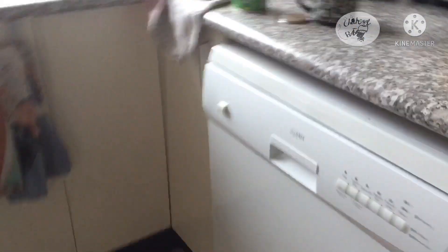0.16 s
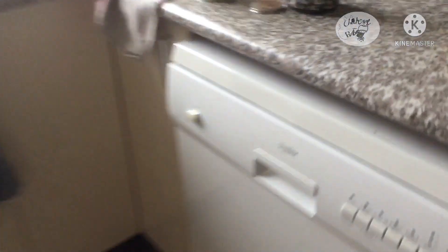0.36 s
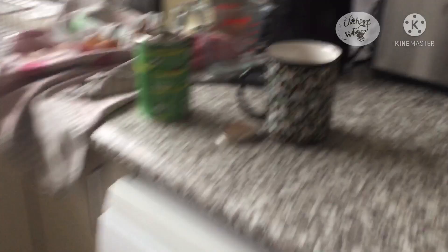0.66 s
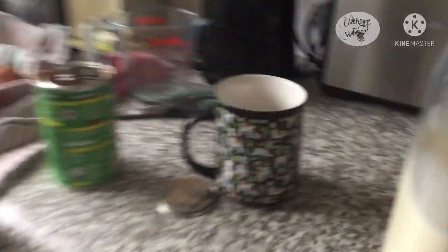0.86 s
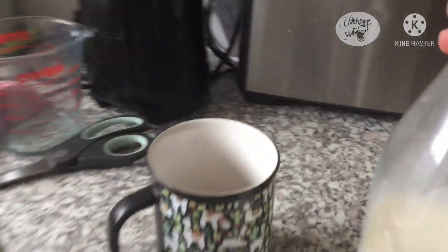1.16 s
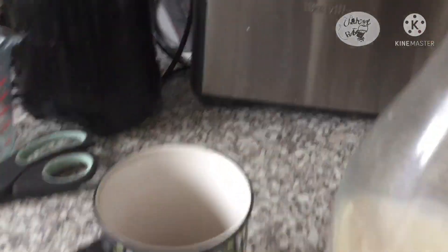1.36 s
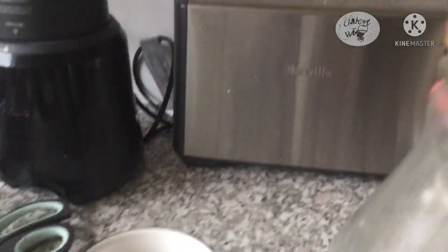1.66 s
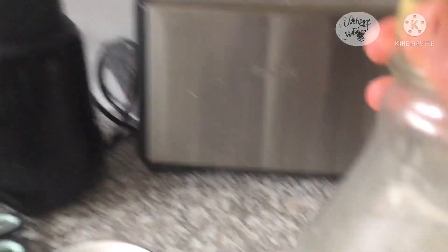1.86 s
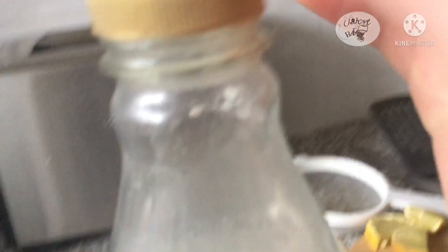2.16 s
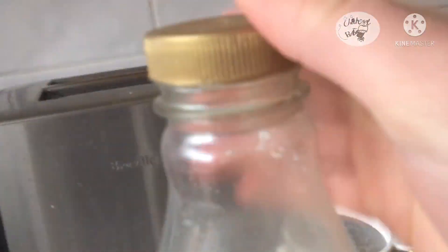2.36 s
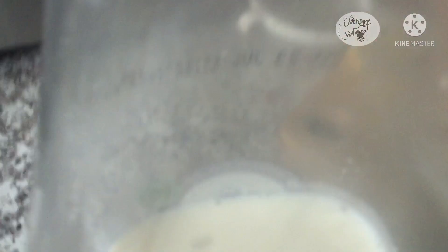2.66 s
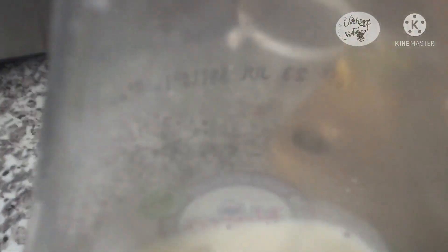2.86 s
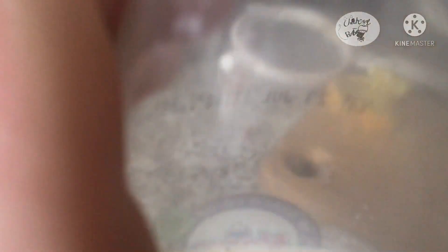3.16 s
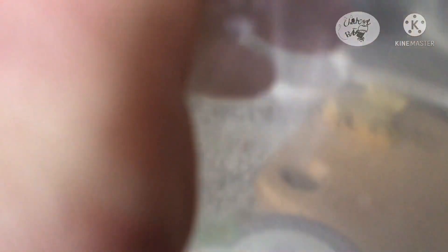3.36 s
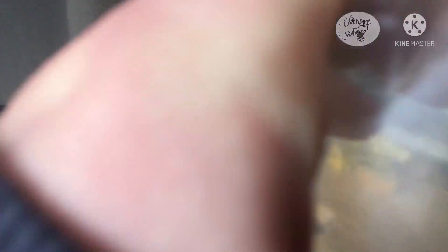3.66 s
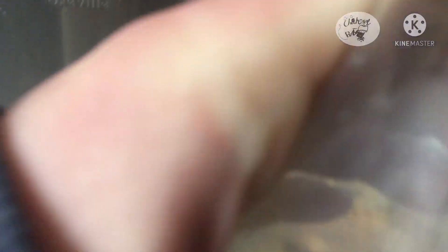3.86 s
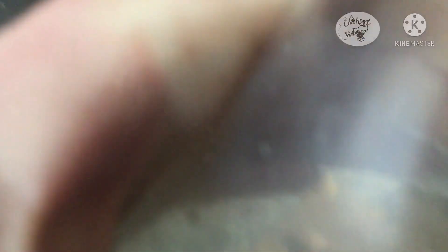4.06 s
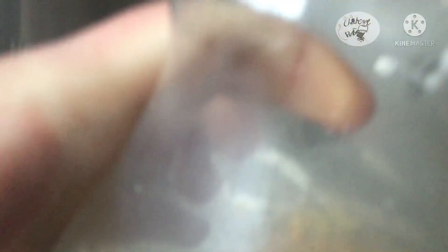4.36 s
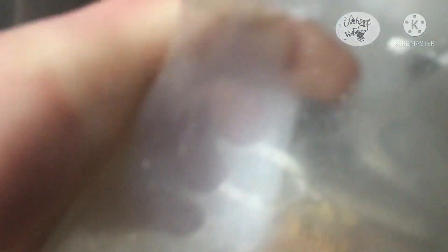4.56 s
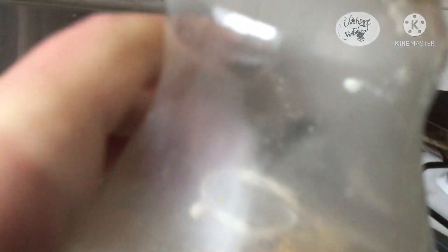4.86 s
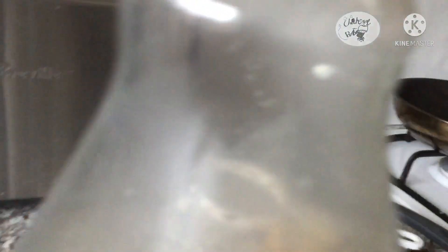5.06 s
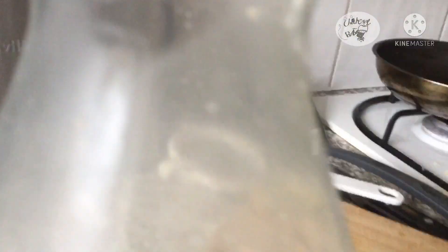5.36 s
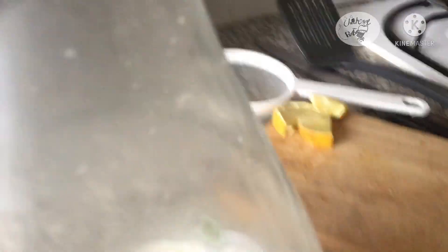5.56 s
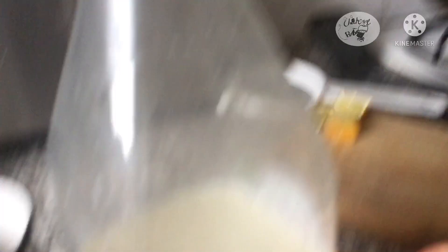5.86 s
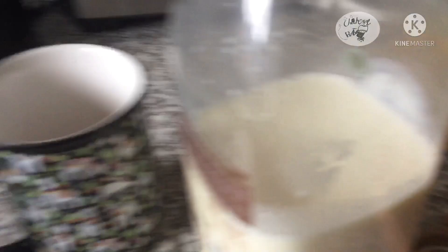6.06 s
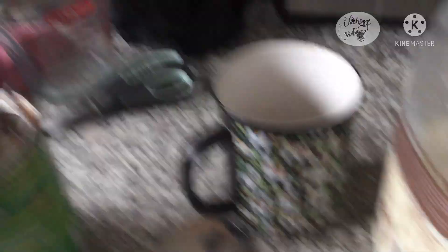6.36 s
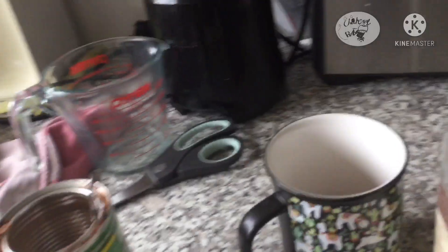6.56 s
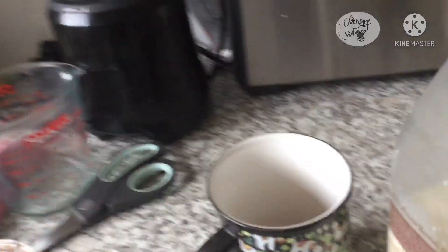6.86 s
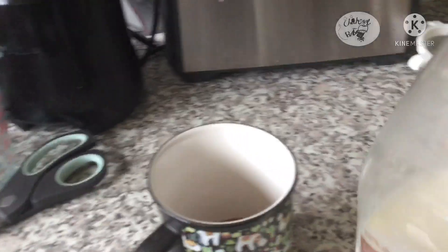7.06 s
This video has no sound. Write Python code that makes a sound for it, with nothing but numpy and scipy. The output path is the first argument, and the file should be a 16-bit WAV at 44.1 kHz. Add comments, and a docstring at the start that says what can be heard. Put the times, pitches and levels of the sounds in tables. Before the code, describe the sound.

Close kitchen handling: a bottle knocks and scrapes on stone, a door thuds, fingers bump the microphone, plastic rubs and squeaks, a cap clacks.

```python
"""A plastic milk bottle is stood on a stone counter, its cap twisted off and clacked down.
Blows excite damped modes of bottle, neck and cap; sliding and twisting are noise from small frictional slips.
A fridge door thuds shut as further modes, and fingers knock on the phone as tones of falling pitch.
A sleeve brushes past as filtered noise, over wavering compressor tones, still air and a sparse reverberation."""
import sys
import numpy as np
from scipy import signal
from scipy.fft import rfft, irfft
from scipy.io import wavfile
from scipy.ndimage import uniform_filter1d

SR = 44100
rng = np.random.default_rng(int(sys.argv[2]) if len(sys.argv) > 2 else 0)


def unload_wav(signal):
    """Save mono or channel-first audio to the path in sys.argv[1] as 16-bit WAV at rate SR, clipped to [-1, 1]."""
    wavfile.write(
        sys.argv[1],
        SR,
        np.round(np.clip(np.atleast_2d(signal).T, -1, 1) * 32767).astype(np.int16),
    )


N = 318380
TIME = np.arange(N) / SR

# Blows of the closing fridge door. Each row: start in seconds, peak of the ring in dB before chatter,
# centre of the force spectrum in Hz, its spread in octaves.
DOOR_STRIKES = [(2.1185, -24, 720, 0.27), (2.124, -22, 312, 1.37), (2.139, -24.5, 200, 1.15),
                (2.169, -23.5, 130, 0.92), (2.198, -37, 115, 0.46)]


def amp(db):
    """Amplitude ratio from the logarithmic decibel scale."""
    return 10 ** (np.asarray(db) / 20)


def unit_rms(x):
    """Normalization to unit root-mean-square amplitude."""
    return x / np.sqrt(np.mean(x ** 2) + 1e-20)


def unit_peak(x):
    """Normalization to unit peak amplitude."""
    return x / (abs(x).max() + 1e-20)


def decaying(t, t60):
    """Exponential decay: the amplitude falls by 60 dB in t60 seconds."""
    return np.exp(-np.log(1000) * t / t60)


def filtered(x, order, edges_hz, kind="low"):
    """Butterworth filtering: a maximally flat passband."""
    return signal.lfilter(*signal.butter(order, edges_hz, kind, fs=SR), x)


def read(points, hz):
    """Interpolation of a spectrum along a logarithmic frequency axis."""
    f, value = np.transpose(points)
    return np.interp(np.log(hz + 1), np.log(f), value)


def level(curve):
    """Gain interpolated in decibels along a curve of (s, dB), at -120 dB outside it."""
    s, db = np.transpose(curve)
    return uniform_filter1d(amp(np.interp(TIME, s, db, left=-120, right=-120)), 200)


def add(mix, s, sound):
    """Linear superposition of a sound on the mix from time s."""
    part = mix[max(round(s * SR), 0):][:len(sound)]
    part += sound[:len(part)]


def colour(x, spectrum):
    """Linear filtering by a magnitude spectrum in dB, normalized to unit rms."""
    hz = np.fft.rfftfreq(N, 1 / SR)
    return unit_rms(irfft(rfft(x) * amp(read(spectrum, hz)), N))


def drift(rate_hz):
    """Low-passed random process of unit rms: fluctuation slower than about rate_hz."""
    hz = np.fft.rfftfreq(N, 1 / SR)
    return unit_rms(irfft(rfft(rng.standard_normal(N)) / (1 + (hz / rate_hz) ** 4), N))


def stroke(s, rise_s, fall_s, db, shape):
    """Stretched-exponential envelope: a movement swells up to time s and dies away."""
    away = np.maximum((s - TIME) / rise_s, (TIME - s) / fall_s)
    return amp(db) * np.exp(-np.minimum(away, 20) ** shape)


def contact(start, end, db, edge_s=0.06):
    """Steady contact: a constant gain between linear ramps."""
    return amp(db) * np.clip(np.minimum(TIME - start, end - TIME) / edge_s + .5, 0, 1)


def together(gains):
    """Incoherent superposition: gains of unrelated movements add in power."""
    return np.sqrt(sum(gain ** 2 for gain in gains))


def room(x):
    """Reverberation: sparse reflections of random sign, each band decaying at its own rate."""
    # Decay of the kitchen. Each row: frequency in Hz, t60 in seconds.
    kitchen = [(100, 0.25), (500, 0.43), (2000, 0.24), (6000, 0.29), (15000, 0.052)]
    taps = rng.choice([-1., 1.], SR // 2) * (rng.random(SR // 2) < .1)
    taps[:SR // 300] = 0  # gap before the first reflection
    hz, t, bands = signal.stft(taps, SR, nperseg=256)
    bands = bands * amp(-60 * t / read(kitchen, hz)[:, None])
    tail = signal.istft(bands, SR, nperseg=256)[1]
    return signal.fftconvolve(x, tail / np.linalg.norm(tail))[:N]


def struck(modes, blows, rise_cycles, detune, rattle, rattle_s, bend=None, damped=None):
    """Modal excitation: each blow wakes the modes near the centre of its force, then chatters briefly."""
    out, t = np.zeros(N), np.arange(SR // 2) / SR
    hz, db, t60 = np.transpose(modes)[:, :, None]
    sign = (-1) ** np.arange(len(hz))[:, None]  # neighbouring modes swing in opposite senses
    swell = 1 - np.exp(-t * hz / rise_cycles)
    for s, peak_db, centre_hz, spread in blows:
        pitch = hz * (1 + detune * rng.standard_normal(hz.shape))
        clock = t if bend is None else np.cumsum(1 + np.interp(s + t, TIME, bend)) / SR
        decay = t60 * damped[1] if damped and s > damped[0] else t60
        force = 1 / (1 + (np.log2(hz / centre_hz) / spread) ** 4)
        envelope = sign * force * amp(db) * swell * decaying(t, decay)
        ring = unit_peak((envelope * np.sin(2 * np.pi * pitch * clock)).sum(0))
        chatter = filtered(rng.standard_normal(len(t)), 2, 400, "high") * np.exp(-t / rattle_s)
        chatter *= rattle / np.linalg.norm(chatter)
        add(out, s, amp(peak_db) * (ring + signal.fftconvolve(ring, chatter)[:len(t)]))
    return out


def tick(db, hz, t60, snap=5.56):
    """Impulsive excitation: a snap and a brief crackle pass one broad resonance, dull far above it."""
    t = np.arange(SR // 6) / SR
    crackle = rng.standard_normal(len(t)) * decaying(t, t60)
    crackle[0] -= snap
    *edges, top = np.minimum([hz / 1.5, hz * 1.5, hz * 2.8], SR * .45)
    crackle = filtered(crackle, 1, top)
    return amp(db) * unit_peak(filtered(crackle, 1, edges, "band"))


def friction(spectrum, slips_per_s, smooth, clump_db, clump_hz):
    """Stick-slip friction: tiny slips of uneven size over a smooth hiss, both swelling in clumps."""
    slips = (rng.random(N) < slips_per_s / SR) * rng.standard_normal(N)
    drive = unit_rms(slips) + smooth * rng.standard_normal(N)
    clumps = amp(clump_db * np.minimum(drift(clump_hz), 1.4))
    return colour(drive * clumps, spectrum)


def patchy(x, depth_db):
    """Changing contact patch: narrow bands swell and fade on their own."""
    bands = signal.stft(x, SR, nperseg=512)[2]
    patches = uniform_filter1d(rng.standard_normal(bands.shape), size=6, axis=0)  # across frequency
    patches = unit_rms(uniform_filter1d(patches, size=12, axis=1))  # across time
    return unit_rms(signal.istft(bands * amp(depth_db * patches), SR, nperseg=512)[1][:N])


def still_air(level_db=-55.5):
    """Stationary broadband noise: the still air of the kitchen."""
    # Relative spectral density. Each row: frequency in Hz, level in dB per Hz.
    air_colour = [(25, -35.5), (50, -4.5), (100, 0), (170, -2.5), (230, -4), (310, -0.5), (420, -8.5),
                  (700, -14), (1200, -17), (2000, -26), (4000, -27), (8000, -32), (16000, -34)]
    return amp(level_db) * colour(rng.standard_normal(N), air_colour)


def fridge(waver_db=7.0, wander=0.01984):
    """Tonal radiation: compressor lines waver in pitch and level as the phone moves through the room."""
    # Compressor lines. Each row: frequency in Hz before wander, rms level in dB before nearness and waver.
    lines = [(178.5, -48.5), (275, -59), (292, -63.5), (359, -68.5)]
    # The phone leaves the fridge and comes back. Each row: time in seconds, gain of the first (lowest)
    # line in dB, gain of the upper lines in dB.
    nearness = np.array([(0, 0.5, -16.5), (.18, -4.5, -9), (.37, -4, 2), (.62, -4, 5), (.87, -14, 5),
                         (1.15, -10, -9.5), (6.4, -26.5, -28), (6.7, -20, -1), (7.2, -11, -23)])
    out = np.zeros(N)
    for k, (hz, db) in enumerate(lines):
        turns = np.cumsum(hz * (1 + wander * drift(18))) / SR
        waver = waver_db * np.minimum(drift(24.0), 1)
        near = level(nearness[:, [0, 2 if k else 1]])
        out += near * amp(db + waver) * np.sin(2 * np.pi * turns)
    return np.sqrt(2) * out


def sleeve():
    """Dry friction of cloth: dense fine slips give a bright hiss as a sleeve brushes past."""
    # Relative spectral density of cloth. Each row: frequency in Hz, level in dB per Hz.
    cloth_colour = [(2500, -17.5), (6000, -8), (9000, 2.5), (13000, 3), (16000, -4)]
    # Brushes. Each row: time at the closest in seconds, rise in seconds, fall in seconds, level in dB.
    passes = [(.02, 0.046, 0.19, -61), (.64, .19, 0.036, -55), (.84, 0.039, .12, -57),
              (1.115, 0.095, .017, -52), (2.86, 0.22, 0.091, -62.5), (3.02, .016, .022, -52.5),
              (5.19, .02, .045, -55), (5.62, 0.26, 0.29, -62)]
    cloth = friction(cloth_colour, slips_per_s=9400, smooth=2.0, clump_db=1.5, clump_hz=30)
    return together(stroke(*row, shape=1.1) for row in passes) * cloth


def scuff(attack_s=0.0056):
    """Amplitude modulation: band noise on a sinking carrier makes one scuff farther off."""
    start_s, level_db, start_hz, halving_s = 0.684, -45.5, 2100, .09
    width_hz, t60 = 1300, 0.36
    out, t = np.zeros(N), np.arange(SR // 3) / SR
    band = unit_rms(filtered(rng.standard_normal(len(t)), 2, width_hz / 2))
    carrier = np.sqrt(2) * np.sin(2 * np.pi * start_hz * halving_s * np.log1p(t / halving_s))
    envelope = np.minimum(t / attack_s, 1) * decaying(t, t60)
    add(out, start_s, amp(level_db) * envelope * band * carrier)
    return out


def door_swing():
    """Displacement of air: the swinging door pushes a low gust ahead of it."""
    # Relative spectral density of the gust. Each row: frequency in Hz, level in dB per Hz.
    gust_colour = [(25, -20), (55, 1), (100, -3), (200, -12), (400, -17.5), (900, -47.5)]
    gust = colour(rng.standard_normal(N), gust_colour)
    return stroke(1.062, rise_s=0.03, fall_s=0.035, db=-31.5, shape=0.77) * gust


def door():
    """Modal vibration of a panel: the fridge door thuds shut."""
    # Modes of the door. Each row: nominal frequency in Hz, relative level in dB, t60 in seconds.
    panel = [(113.7, 5, 0.22), (190.4, 2, 0.15), (262, -6, 0.066), (521, -4, 0.06), (632, 6.5, 0.021),
             (790, -4, 0.033), (1090, -15, 0.025)]
    return struck(panel, DOOR_STRIKES, rise_cycles=0.144, detune=0.061, rattle=1.0, rattle_s=0.014)


def door_crack(over_blow_db=-9.5, centre_hz=852, t60=0.74, room_db=-14):
    """Impulsive contact: the door cracks with its first blow, and the kitchen throws it back."""
    crack = np.zeros(N)
    start_s, blow_db, *_ = DOOR_STRIKES[0]
    add(crack, start_s, tick(blow_db + over_blow_db, centre_hz, t60))
    return crack + room(amp(room_db) * crack)


def knocks(scuff_length=2.7, scuff_top=1.65):
    """Dispersion: a knock crosses the phone's case treble first, so its pitch falls; skin scuffs as it lands."""
    # Finger knocks. Each row: start in seconds, thump envelope peak in dB, starting pitch in Hz,
    # time for the pitch to halve in seconds, peak of the skin scuff relative to the thump in dB.
    blows = [(2.42, -32.5, 968, 0.0072, -30), (2.423, -29.5, 400, 0.0049, -4.5),
             (2.7436, 1.6, 810, 0.0012, -17.5), (3.1157, -39, 945, 0.0046, -6),
             (3.289, -27.5, 1203, 0.00575, 1), (3.2955, -20, 213, 0.013, -14),
             (4.152, -29.5, 171, 0.0097, -4), (4.437, -39, 780, 0.038, 2.5), (4.791, -38, 170, 0.045, -4),
             (5.295, -15.5, 685, 0.0012, -10.5), (5.31, -22, 188, 0.0057, -10.5),
             (6.1517, -34.5, 1250, 0.0016, -18), (6.237, -45, 800, 0.0063, 12.5),
             (6.244, -36.5, 197, 0.032, -13), (6.381, -41, 609, 0.0068, -5.5)]
    out, t = np.zeros(N), np.arange(SR // 10) / SR
    for s, db, hz, halving, scuff_db in blows:
        # a softer knock, whose pitch falls more slowly, also swells for longer
        swell = 0.001483 * (halving / .0008) ** .25
        turns = hz * halving * np.log1p(t / halving)
        thump = -t / swell * np.exp(1 - t / swell) * np.sin(2 * np.pi * turns)
        skin = filtered(rng.standard_normal(len(t)), 2, [hz / 2, hz * scuff_top], "band")
        skin = unit_peak(skin * t * np.exp(-t / (scuff_length * swell)))
        add(out, s, amp(db) * thump)
        add(out, s - swell, amp(db + scuff_db) * skin)
    return out


def ticks(room_db=-20):
    """Transient resonance: snaps of plastic and fingernails close to the phone, with some room."""
    # Ticks and snaps. Each row: start in seconds, peak in dB, centre in Hz, t60 of the crackle in seconds.
    snaps = [(1.0198, -25.5, 6200, 0.13), (1.2143, -19, 4370, 0.0163), (1.288, -28.5, 3100, 0.032),
             (1.3184, -29, 2600, 0.03), (2.405, -39, 11060, 0.024), (2.421, -37.5, 12000, 0.032),
             (2.45, -43.5, 1120, 0.0254), (2.5286, -36, 3460, 0.085), (2.625, -44.5, 2480, 0.036),
             (2.744, -9, 3600, 0.0025), (2.753, -16.5, 10900, 0.017), (2.8794, -24, 7640, 0.017),
             (3.223, -32, 4420, 0.016), (3.2907, -23.5, 5400, 0.03), (3.594, -31, 4200, 0.028),
             (3.861, -27, 13000, 0.019), (4.9546, -38, 3430, 0.026), (4.2804, -31, 5000, 0.0137),
             (4.305, -32, 2600, 0.043), (5.1258, -38, 7000, 0.0082), (5.1543, -41, 4256, 0.041),
             (5.177, -24, 10100, 0.047), (5.2931, -31.5, 5100, 0.029), (5.306, -30.5, 10100, 0.016),
             (6.0684, -21, 3320, 0.027), (6.2351, -29.5, 6600, 0.0336), (6.5793, -45, 3470, 0.025),
             (7.144, -32.5, 3500, 0.025)]
    near = np.zeros(N)
    for s, db, hz, t60 in snaps:
        add(near, s, tick(db, hz, t60))
    return near + room(amp(room_db) * near)


def grip():
    """Cavity resonance: the held bottle booms faintly, and louder when it is squeezed."""
    # Relative spectral density of the boom. Each row: frequency in Hz, level in dB per Hz.
    boom_colour = [(25, -30), (50, -11), (90, -8), (106, -0.5), (120, -0.5), (138, -9), (220, -13),
                   (330, -13.5), (600, -51)]
    # Squeezes. Each row: time of the peak in seconds, length in seconds, level in dB.
    squeezes = [(0.723, 0.14, -49), (2.323, 0.25, -48), (3.313, 0.14, -43), (3.624, 0.046, -42.5),
                (4.054, 0.14, -46.5), (4.255, 0.1, -39), (4.994, 0.21, -44)]
    pushes = [contact(1.56, 4.48, db=-55.5)]
    pushes += [stroke(s, length / 2, length / 2, db, shape=1.9) for s, length, db in squeezes]
    return together(pushes) * colour(rng.standard_normal(N), boom_colour)


def sliding():
    """Sliding friction: plastic pushed over stone sheds slips through a changing contact patch."""
    # Relative spectral density of the scrape. Each row: frequency in Hz, level in dB per Hz.
    scrape_colour = [(290, -42.5), (500, -2), (668, -8), (855, -9), (1060, -2), (1790, -9.5), (2260, -9),
                     (5630, -16), (12000, -22), (16000, -35)]
    # Slides. Each row: time of the hardest push in seconds, rise in seconds, fall in seconds, level in dB.
    slides = [(0.995, 0.0055, 0.025, -54), (1.024, 0.015, 0.063, -41), (1.09, 0.027, 0.087, -52.5),
              (1.219, 0.0056, 0.021, -35.5), (1.29, 0.0046, 0.02, -38), (1.354, 0.049, 0.093, -40),
              (1.492, 0.0092, .009, -46), (2.124, 0.01006, 0.065, -42.5), (6.65, 0.031, 0.033, -60),
              (7.1, 0.027, 0.026, -49), (7.15, 0.029, 0.028, -45)]
    scrape = friction(scrape_colour, slips_per_s=2500, smooth=1.9, clump_db=2.5, clump_hz=69.0)
    scrape = patchy(scrape, depth_db=2.0)
    return together(stroke(*row, shape=1.85) for row in slides) * scrape  # shape 1 = pointed, 2 = rounded


def bottle():
    """Modal vibration of a hollow vessel: rocking milk bends the ring, and a closed hand damps it."""
    # Modes of the bottle. Each row: nominal frequency in Hz, relative level in dB, undamped t60 in seconds.
    vessel = [(75.6, 0, 0.14), (99.2, -3.5, 0.22), (117.3, 1, 0.28), (188.7, -5, 0.18), (226, 1, 0.088),
              (289, 5.5, 0.046), (387.3, -15.5, 0.23), (569, -22.5, 0.11), (674, -17, 0.092),
              (784, -9.5, 0.039), (950, -12, 0.015), (1310, -12, 0.018), (1530, -5, 0.0067),
              (2260, -10, 0.025), (5200, -12, 0.0065)]
    # Blows on the bottle; the last row is the counter's dull answer to the cap. Each row: start in seconds,
    # peak of the ring in dB before chatter, centre of the force in Hz, its spread in octaves.
    blows = [(1.214, -18.5, 1060, 1.04), (1.2144, -17.5, 5050, 0.3), (1.2213, -12, 243, 0.72),
             (1.2406, -21, 300.5, 0.39), (1.255, -17, 540, 0.54), (1.287, -26, 1244, 0.19),
             (1.297, -15.5, 174, 0.86), (1.3175, -26, 2200, 0.42), (1.327, -16.5, 124, 0.72),
             (1.359, -25, 598, 1.2), (1.422, -25.5, 119, 0.18), (1.621, -34, 114.5, 0.088),
             (1.742, -36.5, 104.4, 0.11), (2.563, -30, 107.2, 0.53), (2.655, -34.5, 106, 0.61),
             (4.958, -27.5, 213, 0.4), (6.075, -40, 330, 0.38)]
    slosh = 0.046 * drift(15.4)  # as a share of the pitch
    hand = (1.55, 0.6)  # closes at this time in s, leaving this share of the t60
    return struck(vessel, blows, rise_cycles=0.216, detune=0.028, rattle=0.38, rattle_s=0.018,
                  bend=slosh, damped=hand)


def neck():
    """Modal vibration under impact: taps and catches on the ribbed neck, then the cap bouncing on the counter."""
    # Modes of the neck. Each row: nominal frequency in Hz, relative level in dB, t60 in seconds.
    ribs = [(437, -12.5, 0.029), (578, 1.5, 0.013), (970, 4.5, 0.0062), (1320, 1.5, 0.013),
            (1469, 0.5, 0.012), (2047, -2.5, 0.0069), (3420, -0.5, 0.0034)]
    # Taps and catches on the neck; the last two rows are the cap bouncing on the counter. Each row: start
    # in seconds, peak of the ring in dB before chatter, centre of the force in Hz, its spread in octaves.
    blows = [(2.529, -37, 903, 1.4), (4.1396, -22.5, 1120, 1.2), (4.1433, -27, 1150, 1.5),
             (4.2163, -30.5, 2330, 0.4), (4.873, -36.5, 1280, 1.46), (4.891, -36, 935, 1),
             (4.9546, -22.5, 1450, 1.38), (5.1544, -38.5, 1500, 1.8), (5.1714, -39, 1020, 1.4),
             (5.1745, -28, 1330, 1.23), (5.471, -44, 1500, 0.77), (6.288, -34.5, 1286, 0.6),
             (6.328, -37, 1170, 0.42)]
    return struck(ribs, blows, rise_cycles=0.41, detune=0.02, rattle=1.0, rattle_s=0.0058)


def cap():
    """Modal vibration of a small stiff body: the hard cap clacks down and bounces, its ring dying at once."""
    # Modes of the cap. Each row: nominal frequency in Hz, relative level in dB, t60 in seconds.
    shell = [(1280, 5, 0.0055), (1520, 11.5, 0.0062), (1892, -2, 0.0051), (2350, -12, 0.0092),
             (3720, 2.5, 0.0042), (4290, -5.5, 0.013), (4800, 0, 0.0046), (7230, 0, 0.0081),
             (10500, -8, 0.012)]
    # Blows on the stone. Each row: start in seconds, peak of the ring in dB before chatter,
    # centre of the force in Hz, its spread in octaves.
    blows = [(6.0702, -11.5, 1950, 1.35), (6.2361, -27, 6900, 0.71), (6.288, -39, 7400, 0.14),
             (6.328, -55, 7500, 0.14)]
    return struck(shell, blows, rise_cycles=0.052, detune=0.031, rattle=0.68, rattle_s=0.0027)


def catches(per_s=60, rub_db=-10, spread_db=4.5):
    """Stick-slip: skin catches and lets go in separate snaps, a few of them large."""
    # Relative spectral density of the catches. Each row: frequency in Hz, level in dB per Hz.
    snap_colour = [(400, -10), (1200, -1), (5500, -22), (16000, -18)]
    sizes = amp(spread_db * np.minimum(rng.exponential(1, N), 2)) * rng.choice([-1., 1.], N)
    return amp(rub_db) * colour(sizes * (rng.random(N) < per_s / SR), snap_colour)


def hollow(x, count=5, shell_db=-2, t60=0.03, shift_hz=7):
    """Dense shell resonance: rubbing rings the thin bottle, and shifting fingers change the mixture."""
    t = np.arange(SR // 20) / SR
    rings = rng.standard_normal((count, len(t))) * decaying(t, t60)
    grips = np.exp(2 * np.array([drift(shift_hz) for _ in rings]))
    grips /= np.linalg.norm(grips, axis=0)
    shell = np.zeros(N)
    for share, ring in zip(grips, rings):
        shell += share * signal.oaconvolve(x, ring / np.linalg.norm(ring))[:N]
    return unit_rms(x + amp(shell_db) * shell)


def twisting():
    """Frictional excitation of a shell: turns of the hand swell rub, fizz and wall over a sliding palm."""
    # Relative spectral densities of the hand's rub on the cap, of its fizz and of the groaning bottle wall.
    # Each row: frequency in Hz, level in dB per Hz.
    rub_colour = [(150, -49), (450, -16.5), (850, -2), (1200, 0), (1900, -2.5), (2450, -3), (2900, -11.5),
                  (3500, -9), (4400, -22.5), (7000, -42), (16000, -33)]
    fizz_colour = [(2500, -30), (4500, -2), (5600, -3), (7000, -4.5), (9500, -2), (10500, -9.5),
                   (12500, -5), (16000, -33)]
    wall_colour = [(130, -11), (300, 2.5), (650, -12), (1200, -33)]
    # Turns of the hand. Each row: time of the hardest push in seconds, length in seconds, rub level in dB,
    # fizz relative to the rub in dB, wall relative to the rub in dB.
    turns = [(2.926, 0.05, -53, -12, -5), (3.004, 0.053, -54.5, -17, -8), (3.218, 0.022, -46.5, -5, 3),
             (3.277, 0.096, -50.5, -6.5, -5), (3.411, 0.1, -43.5, -7, -4), (3.5, 0.092, -46, -13.5, -3.5),
             (3.581, 0.1, -40.5, -10, -10), (3.689, 0.09, -50.5, -1.5, 9.5), (3.889, 0.066, -39, -4.5, -19),
             (4.049, 0.15, -44.5, -9.5, -19), (4.225, 0.095, -42, -10, -21), (4.303, 0.082, -45, -16, 1.5),
             (4.453, 0.095, -51, -10, 3), (4.543, 0.034, -58.5, -30, 12)]
    rise_share = 0.49
    # between turns the palm keeps sliding: gain, then fizz and wall relative to the rub in dB
    pushes = [(contact(3.53, 4.3, db=-51), -10.5, -1)]
    for s, length, db, fizz_db, wall_db in turns:
        push = stroke(s, rise_share * length, (1 - rise_share) * length, db, shape=1.35)
        pushes.append((push, fizz_db, wall_db))
    rub = friction(rub_colour, slips_per_s=1200, smooth=0.98, clump_db=1.5, clump_hz=80)
    rub = hollow(rub + catches())
    fizz = friction(fizz_colour, slips_per_s=1200, smooth=1.0, clump_db=-0.5, clump_hz=70)
    fizz = hollow(patchy(fizz, depth_db=3.0))
    wall = friction(wall_colour, slips_per_s=270, smooth=1.0, clump_db=7.0, clump_hz=40)
    rub_gain = together(push for push, _, _ in pushes)
    fizz_gain = together(push * amp(db) for push, db, _ in pushes)
    wall_gain = together(push * amp(db) for push, _, db in pushes)
    return rub_gain * rub + fizz_gain * fizz + wall_gain * wall


def scene():
    """Superposition of all sources and their reverberation; the close knocks hardly stir the room."""
    vessel, panel, lid, ribs, fingers = bottle(), door(), cap(), neck(), knocks()
    wet = room(amp(-10.5) * vessel + amp(-13) * panel + amp(-11.5) * lid
               + amp(-14.0) * ribs + amp(-34.5) * fingers)
    background = still_air() + fridge() + sleeve() + scuff()
    handling = sliding() + twisting() + grip() + ticks()
    impacts = vessel + panel + lid + ribs + fingers + door_swing() + door_crack()
    return (background + handling + impacts + wet)[None]


def record(dry):
    """Hard clipping at full scale on overload, then a linear-phase low-pass as band limit."""
    edge_hz = 16050
    lowpass = signal.firwin(511, edge_hz, window=("kaiser", 9), fs=SR)
    return signal.oaconvolve(np.clip(dry, -1, 1), lowpass[None], "same")


dry = scene()
out = record(dry)
unload_wav(out)
```